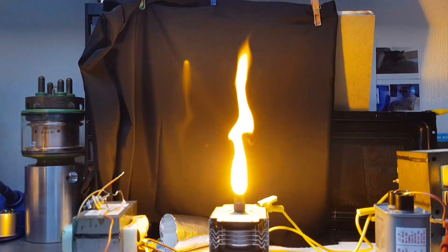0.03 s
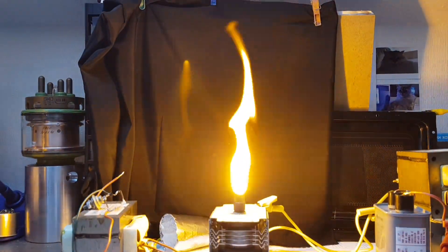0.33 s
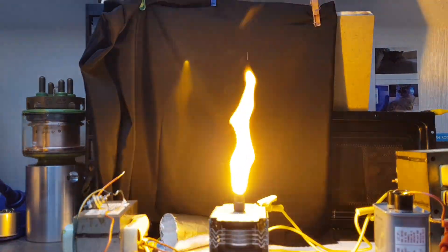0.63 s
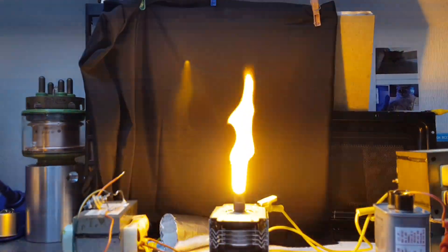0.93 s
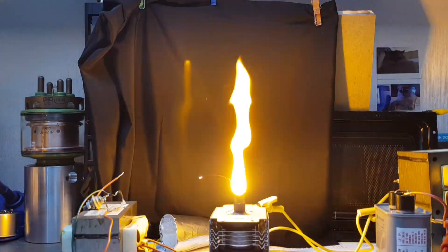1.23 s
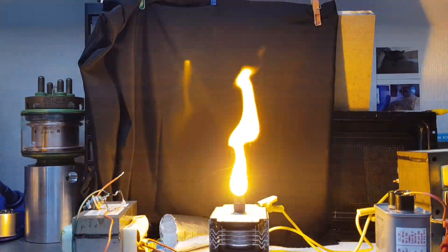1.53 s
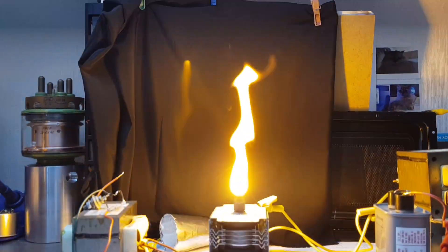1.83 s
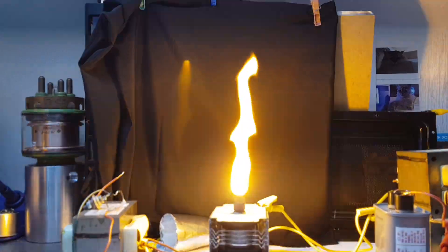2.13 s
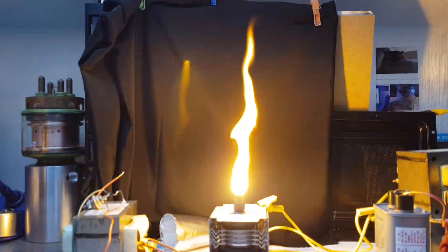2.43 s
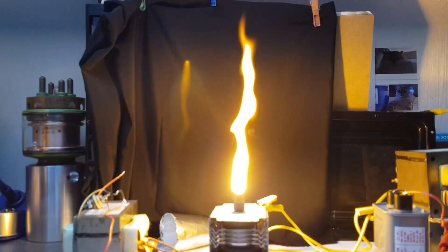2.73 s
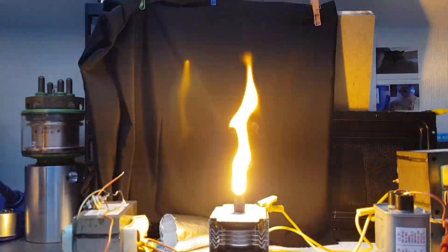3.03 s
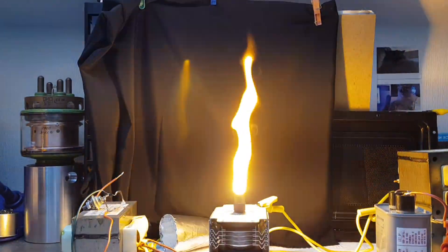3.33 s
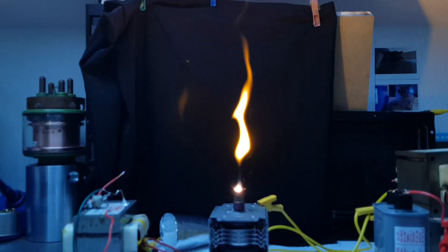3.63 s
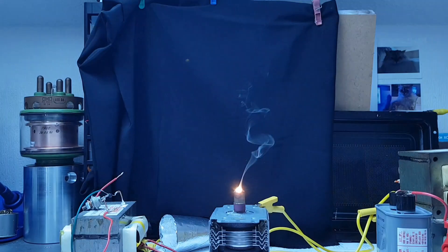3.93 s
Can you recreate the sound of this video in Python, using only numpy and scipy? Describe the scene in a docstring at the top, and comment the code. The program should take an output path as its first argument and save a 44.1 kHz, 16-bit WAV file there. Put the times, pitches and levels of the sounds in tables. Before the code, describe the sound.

Close by in a small room, a loud electrical hum and buzz comes from a plasma flame, with tiny sparks over a faint roar. The power cuts, the flame hisses, whistles and snaps out, then a soft switch click follows.

```python
"""A workbench in a small room, where a high-voltage plasma flame burns, fed from the mains.
It re-ignites every half cycle, which makes a deep hum and a sharp buzz over the soft roar of burning gas.
It swells during the first second, flutters throughout, and small sparks crackle in it.
The power is cut: the flame hisses, whistles and snaps out, and a switch clicks softly."""
import sys
import numpy as np
from scipy import signal
from scipy.fft import rfft, irfft
from scipy.io import wavfile
from scipy.ndimage import uniform_filter1d

SR = 44100
rng = np.random.default_rng(int(sys.argv[2]) if len(sys.argv) > 2 else 0)


def to_wav(sig):
    """Store sig (one row per channel, or 1-D mono) as 16-bit WAV at the path in sys.argv[1].

    Samples outside -1..1 are clipped; the rate is SR.
    """
    pcm = np.clip(np.atleast_2d(sig), -1, 1) * 32767
    pcm = np.round(pcm).astype(np.int16)
    wavfile.write(sys.argv[1], SR, pcm.T)  # frames by channels


N = 176400
MAINS_HZ, POWER_OFF_S = 49.972, 3.662
LOW_T60_S, HIGH_T60_S = .35, .17  # how the flame's lows and highs die away after the cut


def undb(db):
    """Decibels to gain."""
    return 10 ** (np.asarray(db) / 20)

def level(x, db):
    """Scale to an rms level."""
    return x * undb(db) / np.sqrt(np.mean(x ** 2))

def times():
    """Time of every sample, in seconds."""
    return np.arange(N) / SR

def drift(rate_hz):
    """Smooth random drift with a spread of 1."""
    hold = int(SR / rate_hz)
    smooth = uniform_filter1d(np.repeat(rng.standard_normal(N // hold + 1), hold), hold)[:N]
    return smooth / smooth.std()

def colour(x, points, size=2048):
    """Minimum-phase EQ through (Hz, dB) points: nothing rings ahead of an attack."""
    hz, db = np.array(points, float).T
    curve = np.interp(np.log(np.fft.rfftfreq(size, 1 / SR) + 1), np.log(hz), db)
    cepstrum = irfft(np.log(undb(curve)))
    cepstrum[1:size // 2] *= 2
    cepstrum[size // 2 + 1:] = 0
    return signal.fftconvolve(x, irfft(np.exp(rfft(cepstrum))))[:N]

def noise(points, db):
    """Coloured noise at an rms level."""
    return level(colour(rng.standard_normal(N), points), db)

def clicks(at, gain, order=8):
    """Impulses at times in seconds, placed between samples by a windowed sinc."""
    out, position = np.zeros(N), np.ravel(at) * SR
    taps = np.floor(position).astype(int)[:, None] + np.arange(1 - order, order + 1)
    offset = taps - position[:, None]
    pulses = np.ravel(gain)[:, None] * np.sinc(offset) * np.sinc(offset / order)
    np.add.at(out, np.clip(taps, 0, N - 1), pulses)
    return out

def ring(modes, t):
    """Decaying modes struck at t = 0."""
    t = np.maximum(t, 0)
    return sum(undb(db - 60 * t / t60) * np.sin(2 * np.pi * hz * t) for hz, db, t60 in modes)

def power_fade(t60):
    """Full level until the power is cut, then a decay."""
    return undb(-60 * np.maximum(times() - POWER_OFF_S, 0) / t60)

# Slap off the bench and walls, a left list and a right list. Each row: lag in seconds, gain.
EARLY_REFLECTIONS = [
    [(.0008, .2), (.0019, .28), (.0031, .22)],
    [(.00125, .2), (.00235, .28), (.0037, .22)],
]
def room(x, wet_db=-4, t60=.4):
    """Direct sound, near reflections and a short tail that differs from left to right."""
    t, out = times()[:SR // 2], []
    for near in EARLY_REFLECTIONS:
        tail = rng.standard_normal(len(t)) * undb(-60 * t / t60) * (1 - np.exp(-t / .0022))
        response = clicks(*np.array(near).T)[:len(t)] + undb(wet_db) * tail / np.linalg.norm(tail)
        out.append(x + signal.fftconvolve(x, response)[:N])
    return np.array(out)

# Low room tone. Each row: frequency in Hz, relative level in dB.
ROOM_TONE_EQ = [(20, -30), (100, 10), (300, -7), (600, -15), (2000, -26), (6000, -55), (15000, -26)]
def room_tone():
    """The faint, steady bed of the quiet room."""
    return noise(ROOM_TONE_EQ, db=-68)

# Dark body of the roar. Each row: frequency in Hz, relative level in dB.
ROAR_EQ = [(20, -18), (35, -13), (60, -7), (92, 0), (120, -5), (165, -2), (235, -15), (300, -10.5),
           (400, -8), (490, -18), (650, -14), (1400, -18), (3000, -26), (15000, -40)]
def gas_roar():
    """The burning gas roars softly and fades when the power goes."""
    return noise(ROAR_EQ, db=-49) * power_fade(LOW_T60_S)

# The contacts hit and bounce twice. Each row: start in seconds, gain in dB.
CONTACT_HITS = [(3.925, 2), (3.961, -14), (3.98, -9)]
# Ring of the housing. Each row: frequency in Hz, level in dB, time to fall 60 dB in seconds.
HOUSING_MODES = [(250, -58, .2), (470, -49, .06), (554, -44, .24), (595, -47, .07), (1001, -49, .07),
                 (1809, -56, .12), (2105, -50, .06), (3800, -60, .1), (6261, -54, .06)]
# Crack of the contacts. Each row: frequency in Hz, relative level in dB.
CONTACT_EQ = [(150, -6), (550, 7), (1400, 0), (2200, 1), (3000, -10), (4800, -4), (6300, 0), (7500, -5),
              (8300, -12), (9600, -7), (11000, -13), (15000, -16)]
def switch(crack_t60=.12):
    """A crisp clack with bounces that ring the switch housing."""
    t = times()[:SR // 2]
    crack = noise(CONTACT_EQ, db=-51)[:len(t)] * undb(-60 * t / crack_t60)
    at, db = np.array(CONTACT_HITS).T
    return signal.fftconvolve(clicks(at, undb(db)), ring(HOUSING_MODES, t) + crack)[:N]

# Fader ride of the last hiss. Each row: time in seconds, level in dB.
HISS_ENVELOPE = [(3.6, -75), (3.63, -66), (3.64, -40.5), (3.67, -39), (3.69, -42.5), (3.718, -36.5),
                 (3.732, -64), (3.765, -48.5), (3.8, -88), (3.83, -110)]
# Tone of that hiss. Each row: frequency in Hz, relative level in dB.
HISS_EQ = [(40, -1), (150, 13), (300, -1), (600, -2), (1400, 3), (2000, 9), (2600, -6), (4100, -0.5),
           (5500, 0.5), (6300, 3), (8000, -10), (9000, -15), (9600, -5.5), (10300, -9.5), (13400, -15),
           (13950, 2), (14400, -35)]
def dying_hiss(flicker_db=2.1):
    """The shrinking flame hisses in a few ragged spurts."""
    envelope_db = np.interp(times(), *np.array(HISS_ENVELOPE).T, left=-120)
    return noise(HISS_EQ, db=0) * undb(envelope_db + flicker_db * drift(400))

# Path of the whistle. Each row: time in seconds, pitch in Hz, level in dB.
WHISTLE_PATH = [(3.625, 1910, -75), (3.638, 1930, -40), (3.665, 2000, -39), (3.695, 1930, -38),
                (3.7, 1710, -35), (3.745, 1684, -45), (3.84, 1710, -54), (3.9, 1750, -78)]
def dying_whistle():
    """The shrinking flame whistles roughly, then drops in pitch and steadies."""
    t = times()
    at, hz, db = np.array(WHISTLE_PATH).T
    roughness = np.interp(t, (3.69, 3.73), (.04, .017))  # as a share of the pitch
    pitch = np.interp(t, at, hz) * (1 + roughness * drift(700))
    return np.sin(2 * np.pi * np.cumsum(pitch) / SR) * undb(np.interp(t, at, db, left=-120, right=-120))

# Last snaps of the flame. Each row: start in seconds, gain in dB.
SNAP_HITS = [(3.6623, -15), (3.6757, 2), (3.6766, -26), (3.6768, -15)]
# Weighty tone of a snap. Each row: frequency in Hz, gain in dB.
SNAP_EQ = [(40, -36), (200, 15.5), (700, 5), (3000, 1.5), (6000, -3.5), (10000, -9.5), (16000, -11)]
# Thump of the room. Each row: frequency in Hz, level in dB, time to fall 60 dB in seconds.
ROOM_MODES = [(187, -38, .3), (299, -49, 1.1)]
def collapse():
    """The flame snaps out amid its hiss and whistle, and rings the low room modes."""
    at, db = np.array(SNAP_HITS).T
    snaps = colour(clicks(at, undb(db)), SNAP_EQ)
    return room(dying_hiss() + snaps) + dying_whistle() + ring(ROOM_MODES, times() - POWER_OFF_S)

def flutter_phase(rate_hz=10.4, peak_s=.038, wander_cycles=.06):
    """Phase of the flame's flutter: 0 where the deep hum is fullest and most sparks pause."""
    return 2 * np.pi * (rate_hz * (times() - peak_s) + wander_cycles * drift(2.6))

def swell(t, start_s=.11, rise_s=.15, end_s=.99, fall_s=.19):
    """0 for the calm flame, 1 while it is swollen."""
    return np.clip(np.minimum((t - start_s) / rise_s, (end_s - t) / fall_s), 0, 1)

# Extra bite during the swell. Each row: time in seconds, blend from calm (0) towards harsh (1).
RASP_CURVE = [(.24, 0), (.42, 0.55), (.8, 0.65), (.86, 0)]
def rasp(t):
    """How much harder the ignitions crack as the flame swells."""
    return np.interp(t, *np.array(RASP_CURVE).T)

# Thin tone of the sizzle. Each row: frequency in Hz, relative level in dB.
SIZZLE_EQ = [(800, -22), (1500, -2), (2600, -2.5), (4200, -6), (7000, -17), (15000, -17)]
def sizzle():
    """A fine sizzle fills the gaps between discharges and lifts with the rasp."""
    return noise(SIZZLE_EQ, db=-64) * undb(6 * rasp(times())) * power_fade(HIGH_T60_S)

def each_cycle(place, jitter_s):
    """Times of discharges that recur in every mains cycle until the cut: cycles x places."""
    cycle = np.arange(int(POWER_OFF_S * MAINS_HZ))[:, None]
    return (cycle + place) / MAINS_HZ + jitter_s * rng.standard_normal((len(cycle), len(place)))

# Spark pattern. Each row: place in the mains cycle from 0 to 1, relative level in dB,
# share of the flutter in which it fires when calm, the same share when swollen.
SPARK_PATTERN = [(.055, -1.5, .55, .25), (.118, -1, .78, .2), (.215, 1.5, .62, .05), (.322, -3, .99, .99),
                 (.46, -2, 0, .5), (.535, -3, .4, .3), (.73, -3, .3, .35), (.845, -6, .99, .99),
                 (.97, -1, 0, .45)]
# Tone of a spark. Each row: frequency in Hz, relative level in dB.
SPARK_EQ = [(300, -8), (750, 5.5), (950, 5.5), (1250, 5.5), (1700, -3.5), (2100, -3), (3100, 1.5),
            (3600, -7.5), (4050, -4), (4550, -4.5), (5100, -2), (5600, -7), (6250, -4), (8200, -11.5),
            (12000, -10), (16000, -13.5)]
def sparks(flutter, sputter_cycles=.065, flare_db=8, flare_s=.017, flare_width_s=.041):
    """Each spark fires for a share of the flutter; the rarer, the looser in time and strength."""
    place, db, calm_share, swollen_share = np.array(SPARK_PATTERN).T
    looseness = np.sqrt(1 - calm_share)
    at = each_cycle(place, jitter_s=.00002 + .00018 * looseness)
    share = calm_share + (swollen_share - calm_share) * swell(at)
    flutter_cycles = np.interp(at, times(), flutter) / (2 * np.pi)
    flutter_cycles += sputter_cycles * rng.standard_normal((len(at), 1))
    fires = abs(flutter_cycles % 1 - .5) < share / 2
    db = db + 8 * looseness * rng.uniform(-1, 1, at.shape)
    db += flare_db * np.exp(-((at - flare_s) / flare_width_s) ** 2)  # a brief spurt of stronger sparks
    return level(colour(clicks(at, undb(db) * fires), SPARK_EQ), db=-50.5)

# The two ignitions of a mains cycle. Each row: place in the cycle from 0 to 1, relative level in dB.
IGNITION_PATTERN = [(.339, 3.5), (.812, 4.5)]
# Tone of a calm crack, then of a harsh one. Each row: frequency in Hz, relative level in dB.
CALM_CRACK_EQ = [(1200, -33), (1500, -2), (2000, 3.5), (2350, -1), (2550, 0), (3150, 4), (3650, -7.5),
                 (4020, 7), (4400, -7), (5200, -6), (5700, -12), (6200, -3), (6600, -13), (7000, -7),
                 (8200, -21.5), (12000, -17), (16000, -22)]
HARSH_CRACK_EQ = [(1200, -30), (1500, -5), (2000, 8), (2300, 0), (2550, 3.5), (3200, 3), (3650, -9),
                  (4020, 2.5), (4500, -5), (5200, -6), (5750, -16), (6150, 0.5), (6550, -16), (7000, -9),
                  (8200, -17), (16000, -21)]
def ignition_cracks(scatter_db=1.2, harsh_db=4.5):
    """A sharp crack at each ignition, blending towards a harder one in the swell."""
    place, db = np.array(IGNITION_PATTERN).T
    at = each_cycle(place, jitter_s=.00002)
    db = db + scatter_db * rng.standard_normal(at.shape)
    calm = colour(clicks(at, undb(db) * (1 - rasp(at))), CALM_CRACK_EQ)
    harsh = colour(clicks(at, undb(db + harsh_db) * rasp(at)), HARSH_CRACK_EQ)
    return level(calm + harsh, db=-48.7)

def buzz(flutter, side_gain=.35, side_lag_s=.00035):
    """All the discharges in the room; left and right are coloured slightly differently."""
    discharges = sizzle() + ignition_cracks() + sparks(flutter)
    side = side_gain * np.interp(times() - side_lag_s, times(), discharges)
    return room(discharges, wet_db=-3.5) + np.array([side, -side])

# Harmonic stack of the hum. Each row: multiple of the mains, calm level in dB, swollen level in dB,
# left minus right in dB.
HUM_PARTIALS = [(1, -61, -60, 0), (2, -23, -25.3, 0), (3, -57, -50, 2), (4, -47, -32, 0), (5, -53, -62, 0),
                (6, -49, -38, 9), (7, -52, -48, 7), (8, -37, -41, 0), (9, -52, -50, -2), (10, -63, -67, 3),
                (11, -55, -55, 2), (12, -48, -49, 0), (13, -49, -45.5, 0), (14, -56, -55, 2),
                (15, -50, -48.5, 0), (16, -62, -54, -2), (17, -51, -49.5, -2), (18, -58, -72, 2),
                (19, -63, -57, 8), (20, -69, -68, 4), (21, -52, -50, -4), (22, -62, -64, 4),
                (23, -54, -50, 2), (24, -57, -66, -2), (25, -59, -57, -16), (26, -59, -57, 8),
                (27, -60, -61, -20), (28, -64, -58, 6)]
# Partials that throb with the flutter. Each row: multiple of the mains, level in dB.
THROB_PARTIALS = [(4, -49.5), (6, -61), (8, -60), (12, -64), (14, -65), (16, -65), (23, -64), (25, -64),
                  (27, -65)]
def hum(flutter, bass_corner_hz=89, spread_rad=.59, deep_throb_db=.6, swell_throb_db=1.1):
    """Mains partials, lined up into a pressure step at each ignition; some throb with the flutter."""
    t, out = times(), np.zeros((2, N))
    swollen, mains_phase = swell(t), 2 * np.pi * MAINS_HZ * t
    low_fade, high_fade = power_fade(LOW_T60_S), power_fade(HIGH_T60_S)
    for k, calm_db, swollen_db, pan_db in HUM_PARTIALS:
        smear = min(k / 10, 1) ** 2  # the room scatters the phases of the upper partials
        phase = np.angle(sum(undb(db) * np.exp(-2j * np.pi * k * at) for at, db in IGNITION_PATTERN))
        phase += np.arctan(bass_corner_hz / (k * MAINS_HZ))  # phase lead of a bass roll-off
        phase += smear * rng.standard_normal()
        rms = undb(calm_db) * (1 - swollen) + undb(swollen_db) * swollen
        rms *= low_fade if k <= 2 else high_fade
        rms *= undb(np.cos(flutter) * (deep_throb_db if k == 2 else -swell_throb_db * swollen))
        apart = spread_rad * rng.choice([-1, 1]) * smear
        for channel, side in enumerate((.5, -.5)):
            tone = np.sqrt(2) * np.sin(k * mains_phase + phase + side * apart)
            out[channel] += rms * undb(side * pan_db) * tone
    for k, db in THROB_PARTIALS:
        throb_phase, phase = rng.uniform(0, 2 * np.pi, 2)
        out += 2 * undb(db) * high_fade * np.sin(flutter + throb_phase) * np.sin(k * mains_phase + phase)
    return out

def scene():
    """Hum and buzz share one flutter over roar and room tone; then the collapse and the switch."""
    flutter = flutter_phase()
    bed = room(gas_roar() + room_tone(), wet_db=-3)
    return bed + hum(flutter) + buzz(flutter) + collapse() + room(switch())

def record(dry, top_hz=15450):
    """A steep low-pass trims the very top."""
    return signal.sosfilt(signal.ellip(8, .2, 70, top_hz, fs=SR, output="sos"), dry)

dry = scene()
out = record(dry)
to_wav(out)
```